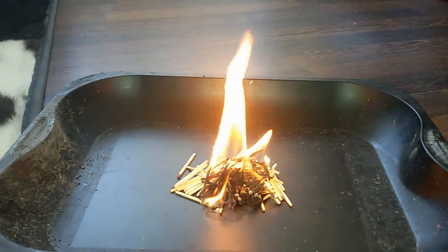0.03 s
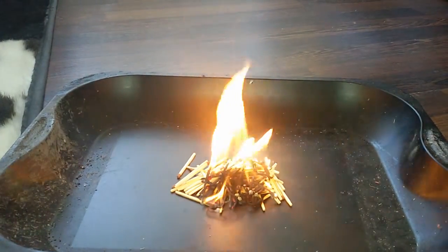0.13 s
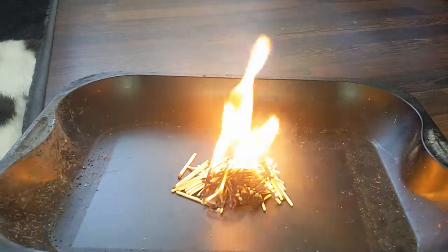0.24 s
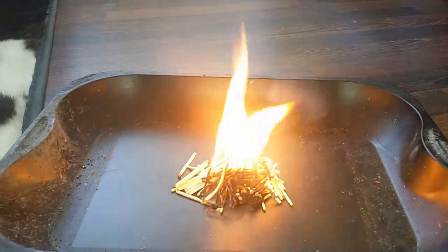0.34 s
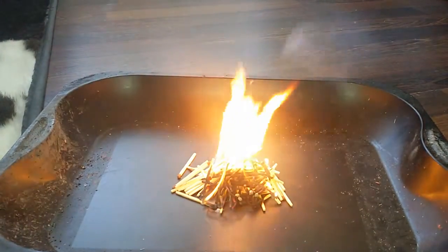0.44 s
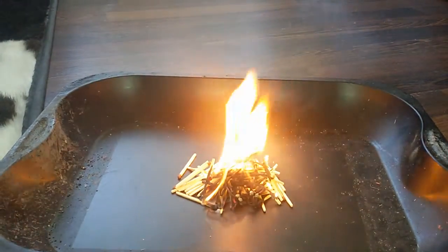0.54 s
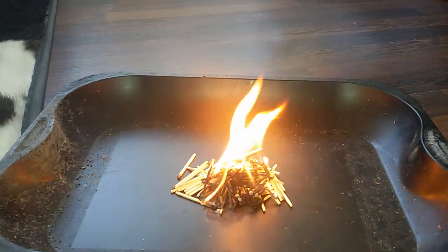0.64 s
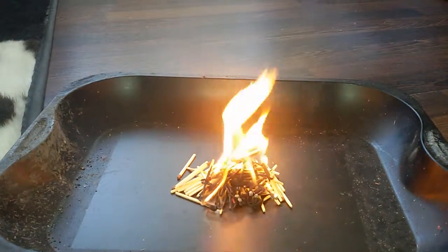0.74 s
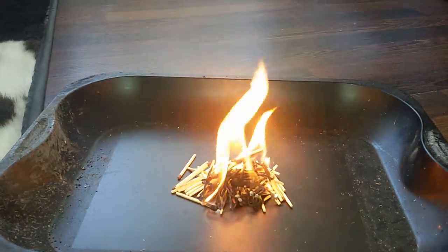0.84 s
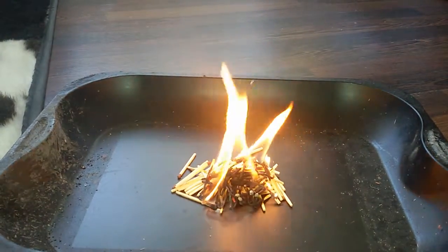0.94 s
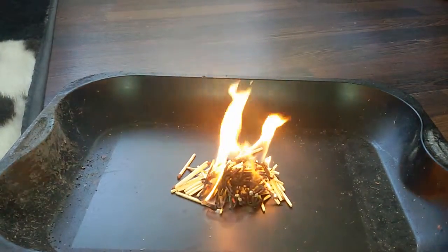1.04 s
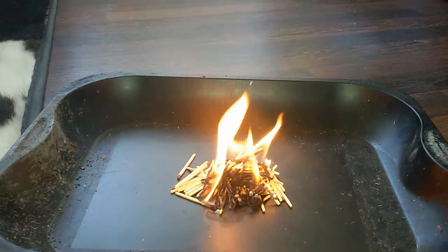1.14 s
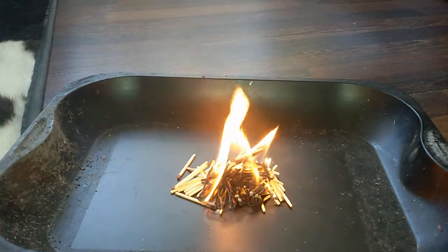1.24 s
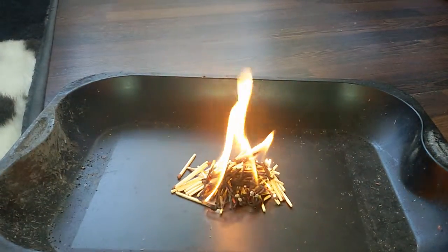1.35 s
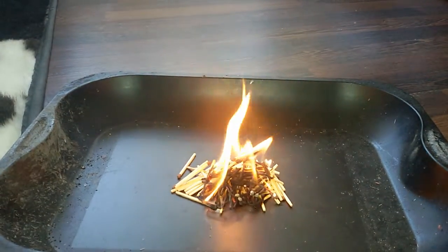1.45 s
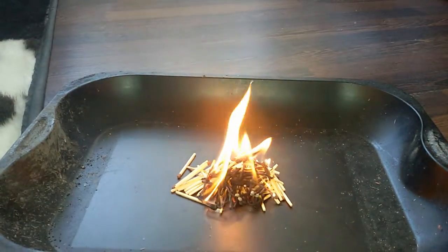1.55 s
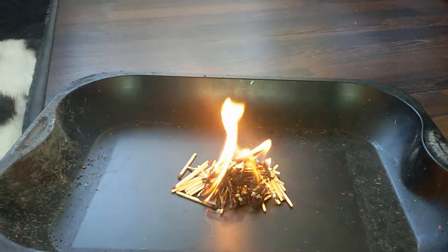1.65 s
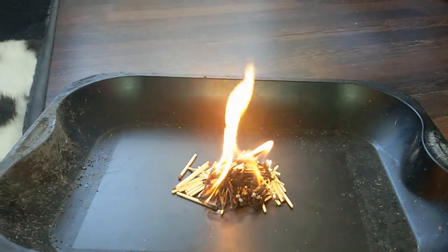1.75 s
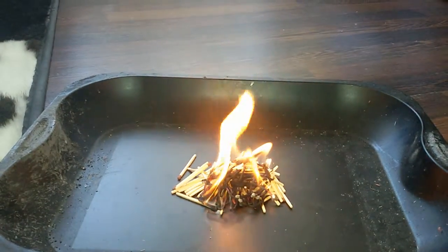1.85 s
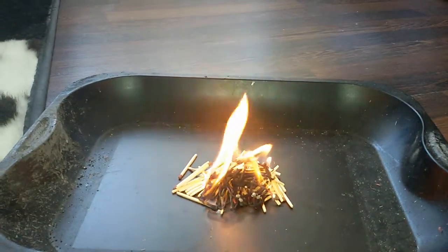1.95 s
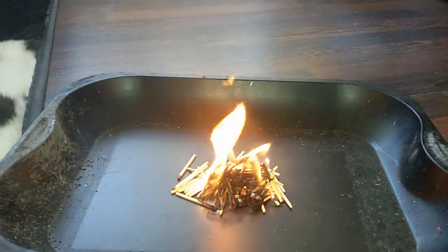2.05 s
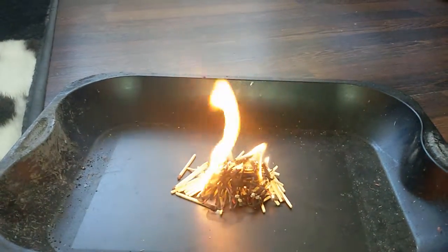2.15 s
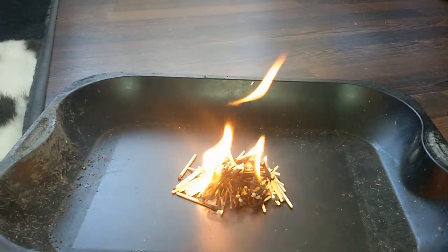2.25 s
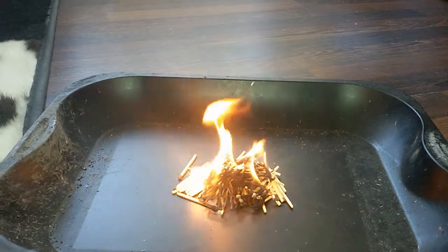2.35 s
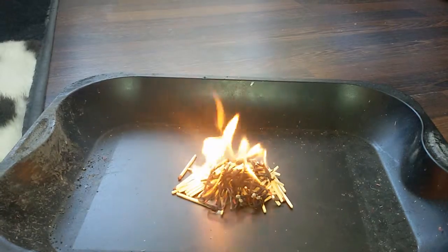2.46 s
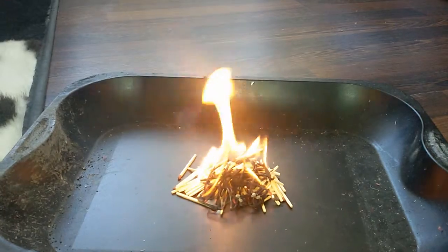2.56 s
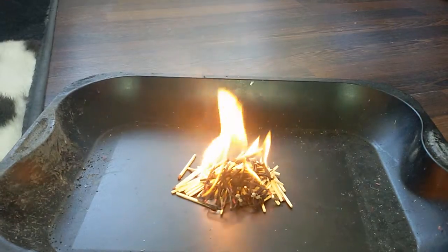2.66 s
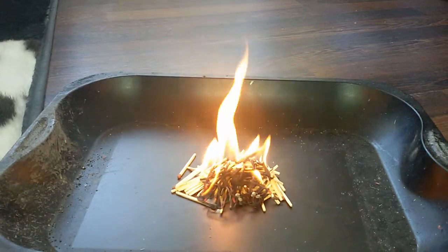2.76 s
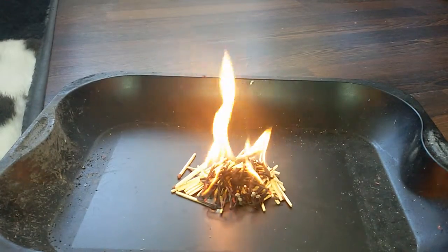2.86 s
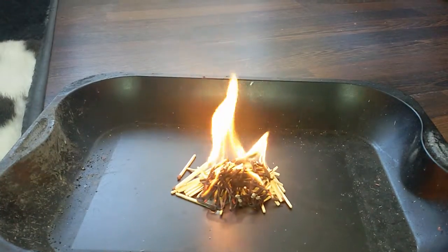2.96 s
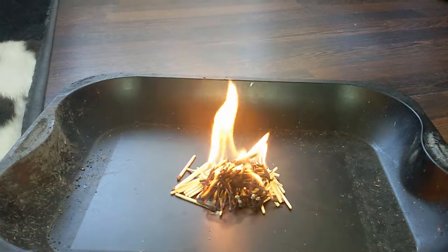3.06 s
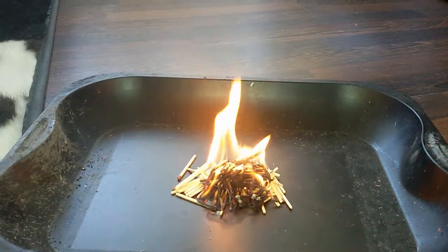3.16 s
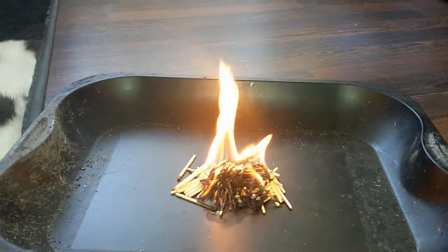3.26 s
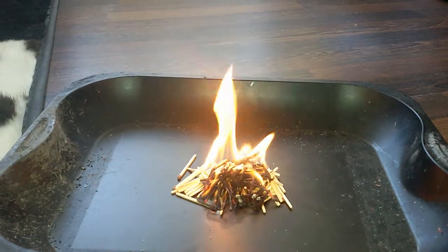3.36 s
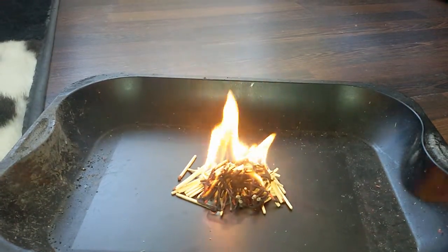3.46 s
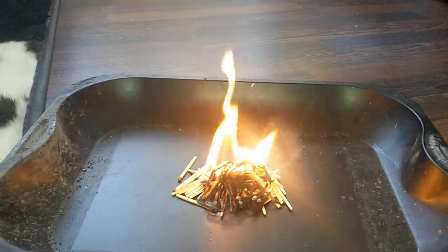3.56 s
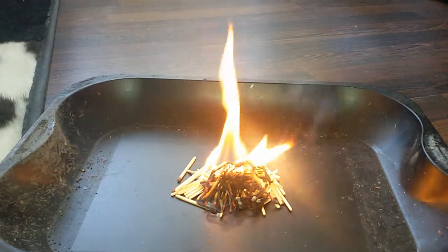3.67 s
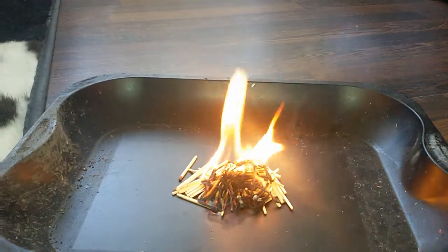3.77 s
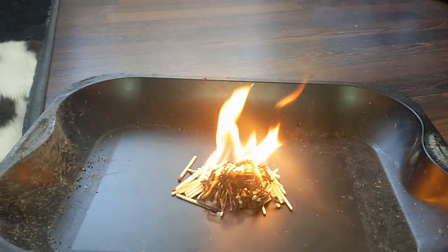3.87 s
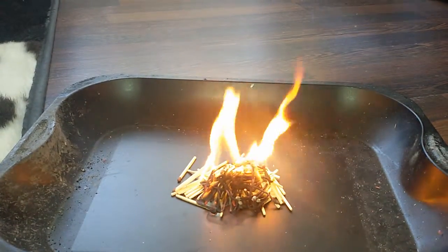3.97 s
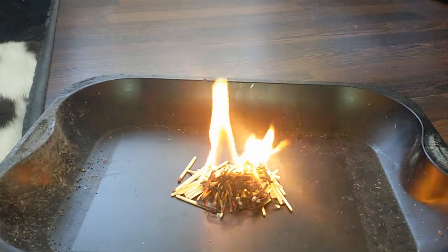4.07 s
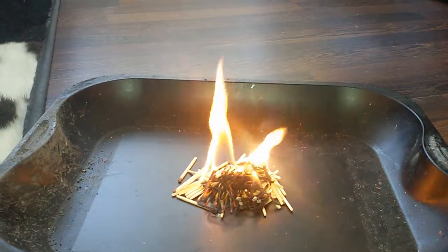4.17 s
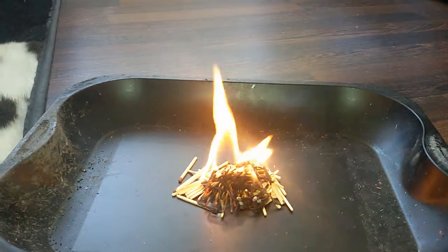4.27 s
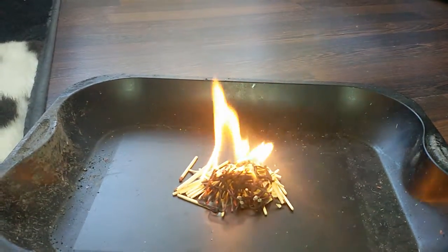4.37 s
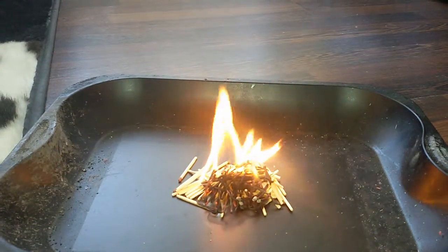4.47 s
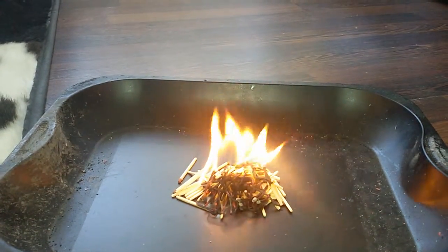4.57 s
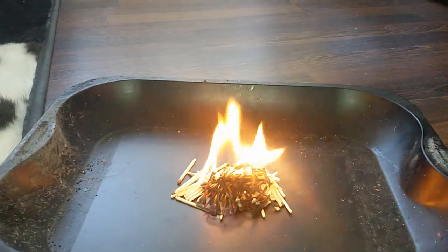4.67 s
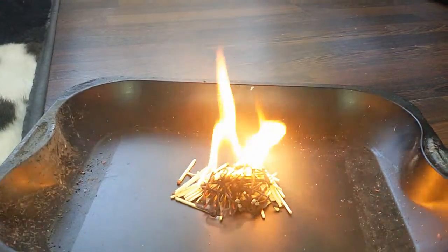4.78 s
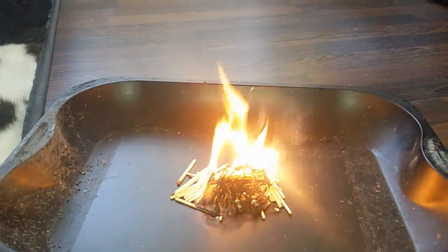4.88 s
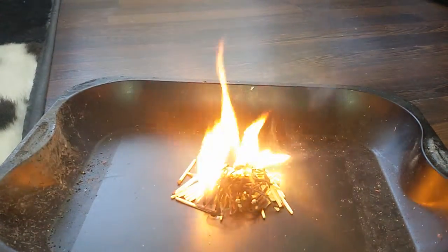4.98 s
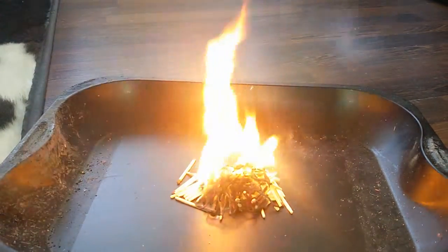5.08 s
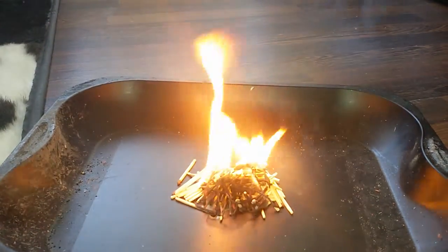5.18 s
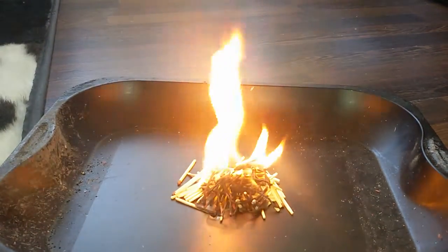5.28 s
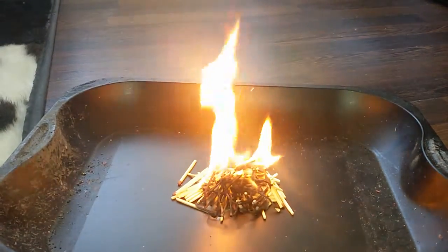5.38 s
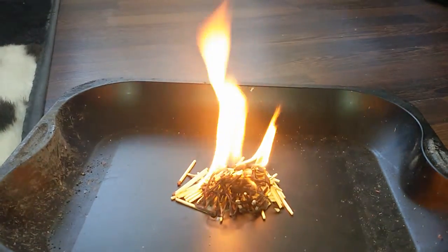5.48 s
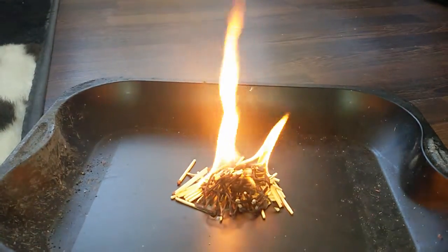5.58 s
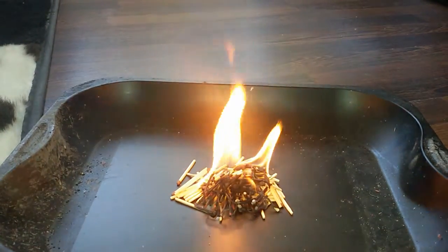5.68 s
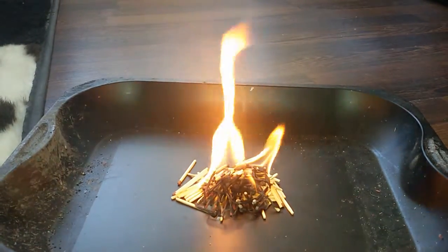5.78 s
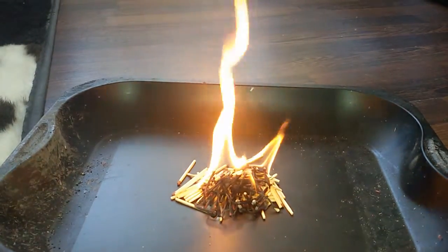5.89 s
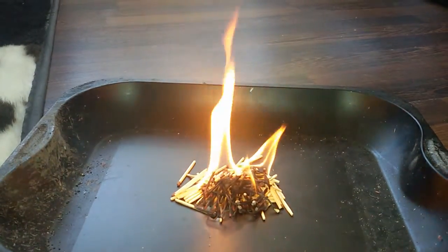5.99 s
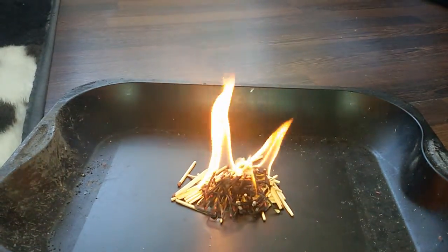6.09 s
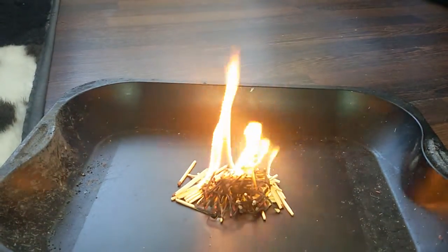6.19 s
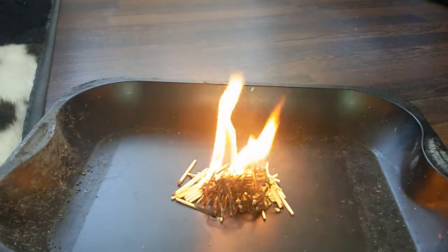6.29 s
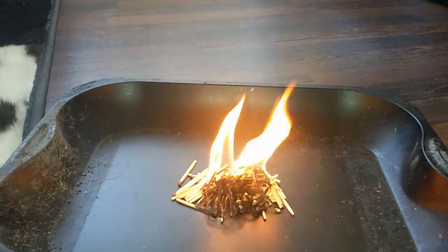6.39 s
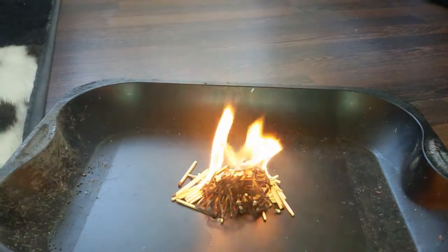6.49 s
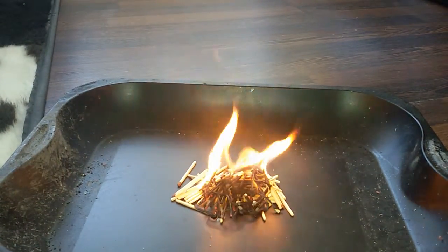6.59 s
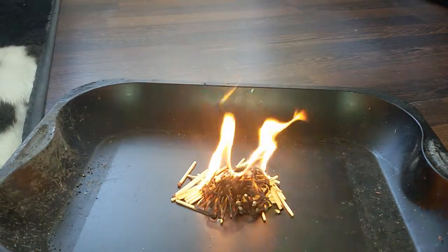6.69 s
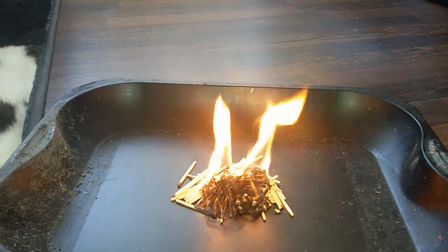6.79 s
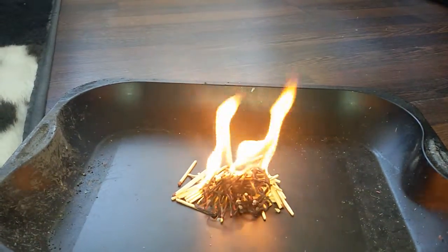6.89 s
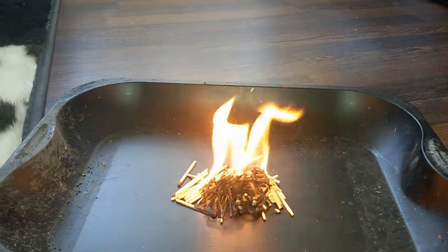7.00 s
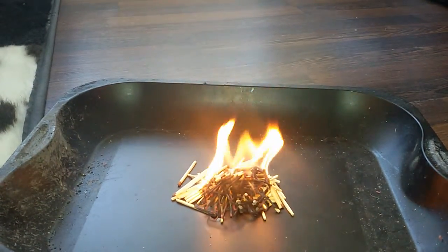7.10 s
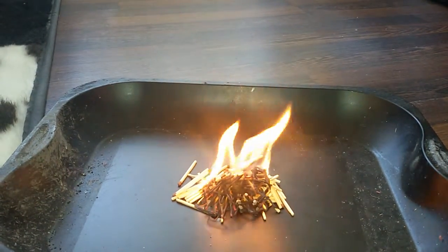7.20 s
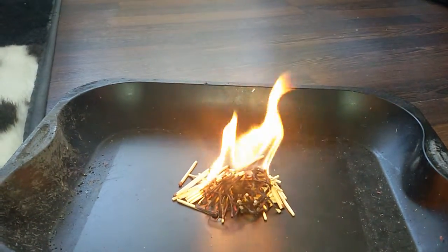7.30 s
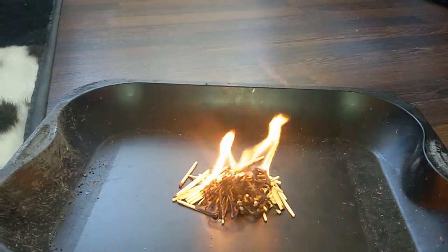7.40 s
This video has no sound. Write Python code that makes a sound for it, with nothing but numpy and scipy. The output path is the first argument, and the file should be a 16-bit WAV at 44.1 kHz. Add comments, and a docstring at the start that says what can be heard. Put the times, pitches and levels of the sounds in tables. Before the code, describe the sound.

A small match fire in a thin metal tray, close microphone, little echo. Flares of grainy hiss come irregularly, some hollow and midrange, some bright and crisp, each under half a second. Sharp pops and fine treble frying ride on them. Between flares only faint room air and hum remain. The strongest sputtering comes past the middle, followed by a dull puff and spitting gas jets.

```python
"""In a quiet room, a pile of wooden matches burns close by in a metal roasting tray.
Head after head catches: random tiny gas bursts make a dense sizzle, over a soft rush of flame (coloured noise).
Crackles and sharp pops are single pushes of gas; molten heads fry finely and spit short jets of noise.
Pockets of gas catch with a low puff of about one cycle. The tray's resonances colour the bursts and jets.
The room adds air noise, a faint hum, a low drone that swells once, and a short echo."""
import sys
import numpy as np
from scipy import signal
from scipy.fft import rfft, irfft, next_fast_len
from scipy.io import wavfile
from scipy.ndimage import map_coordinates

SR = 44100
rng = np.random.default_rng(int(sys.argv[2]) if len(sys.argv) > 2 else 0)


def to_wav(sig):
    """Store sig (one row per channel, or 1-D mono) as 16-bit WAV at the path in sys.argv[1].

    Samples outside -1..1 are clipped; the rate is SR.
    """
    pcm = np.clip(np.atleast_2d(sig), -1, 1) * 32767
    pcm = np.round(pcm).astype(np.int16)
    wavfile.write(sys.argv[1], SR, pcm.T)  # frames by channels


N = 328448
TIME = np.arange(N) / SR  # s
SIZE = next_fast_len(N + 16384, True)  # room at the end for filters to ring out
FREQ = np.fft.rfftfreq(SIZE, 1 / SR)  # Hz
REFERENCE_DB = -45.5  # sizzle level at which burst and crackle rates are given


def amp(db):
    """Decibels to gain."""
    return 10 ** (np.asarray(db) / 20)


def unit(x):
    """Scale to rms 1."""
    return x / np.sqrt(np.mean(x ** 2) + 1e-20)


def curve(rows):
    """Join (t/s, value) rows into one value per sample."""
    return np.interp(TIME, *np.transpose(rows))


def wobble(rate):
    """A smooth random curve through `rate` random points a second."""
    points = rng.standard_normal(int(N * rate / SR) + 4)
    return map_coordinates(points, [TIME * rate])


def colour(points):
    """Gain per frequency from (f/Hz, level/dB) points on a log axis."""
    hz, db = np.transpose(points)
    return amp(np.interp(np.log(FREQ + 1), np.log(hz), db))


def filtered(x, response):
    """Pass x through a frequency response."""
    return irfft(rfft(x, SIZE) * response, SIZE)[:N]


def noise(points):
    """Coloured noise of rms 1."""
    return unit(filtered(rng.standard_normal(N), colour(points)))


def add(track, s, sound):
    """Mix a sound into a track at time s, in seconds."""
    part = track[max(round(s * SR), 0):][:len(sound)]
    part += sound[:len(part)]


def resonances(rows):
    """Gain per frequency from (f/Hz, width/Hz, level/dB) rows: bell-shaped peaks and dips."""
    return amp(sum(db * np.exp(-.5 * ((FREQ - hz) / width) ** 2) for hz, width, db in rows))


def causal(gain):
    """The fastest response with this gain that never sounds ahead of its cause."""
    cepstrum = irfft(np.log(gain), SIZE)
    cepstrum[1:SIZE // 2] *= 2
    cepstrum[SIZE // 2 + 1:] = 0
    return np.exp(rfft(cepstrum))


def in_tray(points, ripple, turn_hz=2600):
    """Response, of energy 1, of one tiny burst heard in the tray."""
    # resonances (+) and notches (-) of the tray, for every burst: f/Hz, width/Hz, level/dB
    tray = [(550, 25, 2), (730, 45, 2.5), (1314, 9.6, 9), (1463, 37, -3.5), (1613, 98, 5), (1776, 61, -6),
            (1950, 44, 2)]
    response = causal(colour(points) * resonances(tray + ripple))
    # the pressure swings both ways before it rings out
    response = response * (1j * FREQ - turn_hz) / (1j * FREQ + turn_hz)
    return response / np.linalg.norm(irfft(response, SIZE))


def room():
    """Steady air noise and hum tones with a slightly drifting phase; a low drone swells once."""
    # colour of the room's air noise: f/Hz, relative level/dB
    air_colour = [(15, -61), (30, -14), (50, 0.5), (105, -0.5), (190, -3), (310, -5.5), (420, -12),
                  (600, -6), (720, -10), (910, -10), (1050, -13.5), (1920, -9), (3350, -14), (14500, -21.5)]
    # hum tones in the room: f/Hz, rms level before the hum's 1 dB cut/dB
    hum_tones = [(102.3, -86), (146, -76.5), (198, -75), (498, -81), (861.3, -78), (931.3, -75.5),
                 (1147, -79), (1863, -80)]
    hum = np.zeros(N)
    for hz, db in hum_tones:
        hum += amp(db) * np.sqrt(2) * np.sin(2 * np.pi * hz * TIME + .5 * wobble(6))
    drone_level = amp(curve([(1.85, -100), (2.02, -69), (2.33, -62), (2.5, -100)]))
    drone = drone_level * np.sin(2 * np.pi * 68 * TIME)
    return amp(-61.5) * noise(air_colour) + amp(-1.0) * hum + drone


def burn(s, length, attack, sag_db):
    """Strength of one head: it catches, sags as it burns, dies fast, and its last part smoulders on."""
    release_s, smoulder_db, smoulder_db_per_s = 0.028, -11.5, 34
    age = np.maximum(TIME - s, 0)
    spent = np.maximum(age - length, 0)  # time since the head burned out
    rest = amp(smoulder_db)
    dying = (1 - rest) * np.exp(-spent / release_s) + rest * amp(-smoulder_db_per_s * spent)
    return (1 - np.exp(-age / attack)) * amp(-sag_db * (age - spent)) * dying


def lagged(power, lag_s):
    """Follow a power with a time lag."""
    keep = np.exp(-1 / (lag_s * SR))
    return signal.lfilter([1 - keep], [1, -keep], power)


def blaze(embers_db=-80, steady_flame_db=-69, flame_lag_s=0.032, melt_lag_s=0.037):
    """All heads add in power: sizzle dB, its bright share, and the strengths of flame and frying."""
    # match heads catching: t/s, burn length/s, attack/s, sizzle level/dB, sag (negative: swell)/dB per s,
    # brightness (0 hollow - 1 bright), flame level/dB, frying level/dB; levels ahead of attack, sag and lag
    heads = [(0.0, 0.15, 0.022, -66, -5, .8, -78, -80), (0.223, 0.38, .044, -41.5, 1, .05, -51.5, -66),
             (0.634, 0.14, 0.036, -46.5, -6, 0.1, -51, -57),
             (0.88, 0.058, 0.01, -53.5, 3, 0.22, -66, -55.5), (2.156, 0.16, 0.027, -60.5, 1, 0.8, -63, -78),
             (2.334, 0.46, 0.012, -53, 4, 0.77, -56.5, -67),
             (3.548, 0.17, 0.025, -41.5, 8.5, 0.026, -49.5, -70),
             (3.733, 0.072, 0.023, -48.5, 7, .03, -49.5, -59), (3.876, 0.05, 0.017, -56, 2, .05, -59, -59),
             (4.12, 0.41, 0.011, -53, 13.5, .04, -55, -62.5),
             (4.733, 0.099, 0.017, -55, -0.5, .1, -59, -67), (4.793, 0.17, 0.0087, -45, 6, .05, -53, -61),
             (4.929, 0.12, 0.024, -36.5, 11, 0.8, -45.5, -60),
             (5.109, 0.138, .015, -42, 27, 0.58, -49, -51.5), (5.354, .1, 0.019, -53, 4, 0.95, -54, -73),
             (5.505, 0.27, 0.016, -46.5, 16, 0.71, -50, -60),
             (6.193, 0.058, 0.027, -42.5, -2.5, .02, -53.5, -70),
             (6.288, 0.28, 0.013, -41, 10.5, 0.12, -49.5, -66),
             (6.393, 0.13, 0.021, -44, 10, .35, -56, -50),
             (6.886, 0.4, 0.022, -49, 10, 0.016, -52.5, -59.5),
             (7.312, 0.11, 0.02, -57.5, 12, .05, -60, -65)]
    heat = bright = rush = melt = 0
    for s, length, attack, db, sag_db, share, flame_db, fry_db in heads:
        power = burn(s, length, attack, sag_db) ** 2
        heat = heat + power * amp(db) ** 2
        bright = bright + power * amp(db) ** 2 * share
        rush = rush + power * amp(flame_db) ** 2
        melt = melt + power * amp(fry_db) ** 2
    heat = heat + amp(embers_db) ** 2
    # the flame and the frying melt follow the heads with a lag
    rush = lagged(rush, flame_lag_s) + amp(steady_flame_db) ** 2
    melt = lagged(melt, melt_lag_s)
    return 10 * np.log10(heat), bright / heat, np.sqrt(rush), np.sqrt(melt)


def bursts(rate, spread_db, smooth):
    """Random tiny bursts of uneven size, plus a share of smooth gas hiss (0-1), rms about 1."""
    sizes = amp(spread_db * np.clip(rng.standard_normal(N), -2, 2))
    happens = rng.random(N) < rate / SR
    # dividing by sqrt(rate) stops denser bursts from being louder overall
    train = happens * sizes * rng.choice([-1, 1], N) / np.sqrt(rate)
    return np.sqrt(1 - smooth) * unit(train) + np.sqrt(smooth) * rng.standard_normal(N)


def sizzle(level_db, share, hollow, bright):
    """The harder a head burns, the louder and denser its bursts; the jet flutters as it goes."""
    rate = 2000 * amp(.5 * (level_db - REFERENCE_DB))  # bursts per second
    strength = amp(level_db + 0.68 * wobble(45) + 0.55 * wobble(170))
    soft = strength * np.sqrt(1 - share) * bursts(rate, spread_db=4.0, smooth=0.33)
    sharp = strength * np.sqrt(share) * bursts(.55 * rate, spread_db=0.5, smooth=0.28)
    return amp(-1.16) * filtered(soft, hollow) + amp(-2.0) * filtered(sharp, bright)


def frying(melt, fine):
    """A molten head crackles finely in the treble."""
    return filtered(melt * bursts(1000, spread_db=1, smooth=0.53), fine)


def flame(rush):
    """The flame rushes softly, and puffs for about one cycle when a pocket of gas catches."""
    # colour of the rushing flame: f/Hz, relative level/dB
    rush_colour = [(25, -22), (60, -2.5), (160, 2), (320, -1), (700, -4.5), (1200, -5.5), (3000, -12),
                   (15000, -27)]
    # gas pockets catching, the biggest at two pitches: t/s, level before fading in and out/dB, f/Hz
    puffs = [(3.2171, -44, 125), (3.309, -45, 134), (5.4400, -31, 175), (5.4402, -32, 540),
             (5.491, -42, 190), (5.5008, -34.5, 264)]
    out = rush * amp(-0.5 + 1.7 * wobble(25)) * noise(rush_colour)
    t = np.arange(SR // 20) / SR
    for s, db, hz in puffs:
        swing = np.sin(2 * np.pi * hz * t + 1.84)
        envelope = np.exp(-(hz * t / 0.91) ** 2) * (1 - np.exp(-t / 0.0003))
        add(out, s, -amp(db) * swing * envelope)
    return out


def crackles(level_db, share, crowding=.4, growth=.78, bright_db=5):
    """Small random pops as (s, dB, brightness); a fierce head makes more, but its sizzle covers them."""
    # rate and level at the reference sizzle; bright heads then add level
    crackles_per_s, crackle_db, spread_db = 32, -36, 1.9
    effort_db = level_db - REFERENCE_DB
    chance, size = rng.random(N), rng.standard_normal(N)
    at = np.flatnonzero(chance < crackles_per_s * amp(crowding * effort_db) / SR)
    db = crackle_db + growth * effort_db[at] + bright_db * share[at]
    db = db + spread_db * np.clip(size[at], -2, 2)
    return list(zip(TIME[at], db, share[at]))


def pops(small_pops, hollow, bright, scatter_db=-26, scatter_t60=0.022,
         hollow_hz=5200, bright_hz=11000, hollow_db=6, bright_db=0.57):
    """Each pop is one push of gas and a brief dense scatter in the tray."""
    # loud bursts of a head's crust: t/s, level before the gains and softening below/dB, brightness (0-1)
    crust_pops = [(0.5352, -24.5, 0.32), (0.8184, -26.5, 0.57), (0.8758, -31, 0.44), (0.8925, -31.5, 1),
                  (0.9336, -22.5, 1), (1.159, -43, 0.98), (2.2059, -36.5, 1), (2.2599, -37, 1),
                  (2.274, -33.5, 1), (2.3511, -31, 1), (2.6184, -32.5, .4), (2.6982, -28.5, .85),
                  (2.7308, -24.5, 0.85), (2.7417, -37, 1), (2.7637, -23, 1), (3.77, -28.5, 0),
                  (3.7779, -34, 0), (3.784, -30.5, 0), (3.9118, -30.5, 0.46), (3.9347, -30, 0.1),
                  (4.3354, -38, .1), (4.392, -35, 0.27), (4.4229, -35.5, 0), (4.4531, -32.5, 0),
                  (4.4594, -32.5, 0.04), (4.9804, -18.5, 1), (4.9891, -20.5, .97), (5.025, -18.5, 0.67),
                  (5.0474, -22.5, 0.9), (5.102, -21.5, 0.89), (5.225, -32.5, .1), (5.2609, -22.5, 1),
                  (5.4561, -31, 0.55), (5.5027, -31.5, .8), (5.6866, -28.5, 0.7), (5.7003, -31.5, 0.24),
                  (5.7657, -24.5, 0.9), (5.7867, -24.5, 1), (6.2769, -21.5, .9), (6.2835, -28, .3),
                  (6.5171, -21, .85), (6.7494, -34, 0.54), (6.9106, -34, .06), (7.1863, -29.5, .05),
                  (7.2202, -31.5, 0.1), (7.2343, -33, 0.3), (7.2495, -32.5, .1), (7.2791, -35.5, 0.1),
                  (7.3325, -36.5, 0)]
    t = np.arange(SR // 20) / SR
    dull, sharp = np.zeros(N), np.zeros(N)
    for s, db, share in list(crust_pops) + small_pops:
        push = amp(scatter_db - 60 * t / scatter_t60) * rng.standard_normal(len(t))
        push[0] = 1
        add(dull, s, amp(db + hollow_db) * (1 - share) * push)
        add(sharp, s, amp(db + bright_db) * share * push)
    out = np.zeros(N)
    for track, response, hz in [(dull, hollow, hollow_hz), (sharp, bright, bright_hz)]:
        # the pops are softened: their treble rolls off above a fixed corner
        softened = response / (1 + 1j * FREQ / hz) ** 2
        out += filtered(track, softened) / np.abs(irfft(softened, SIZE)).max()
    return out


def spits(rough, fine):
    """Gas breaks through the melt in jets that die within milliseconds."""
    # short jets of gas: t/s, level before fading in and out/dB, time to fall 60 dB/s, fine share (0-1)
    jets = [(0.7856, -41, 0.027, 0), (4.761, -36.5, 0.01, 0.4), (5.1396, -18, 0.031, 0.01),
            (5.167, -28, 0.028, 0), (5.3973, -31.5, 0.014, 0.1), (6.409, -24, 0.0089, 0.2),
            (6.4327, -28, 0.0099, 0.6), (6.458, -23.5, 0.0093, 0.06), (6.4735, -14, 0.0069, 0.56),
            (6.5257, -27, 0.012, 0.7), (6.5362, -24.5, 0.0075, .4)]
    t = np.arange(SR // 10) / SR
    coarse, thin = np.zeros(N), np.zeros(N)
    for s, db, t60, share in jets:
        envelope = amp(db - 60 * t / t60) * (1 - np.exp(-t / 0.00083))
        jet = envelope * rng.standard_normal((2, len(t)))
        add(coarse, s, np.sqrt(1 - share) * jet[0])
        add(thin, s, np.sqrt(share) * jet[1])
    return filtered(coarse, rough) + filtered(thin, fine)


def walls(x, t60=0.24, wet_db=-17):
    """A faint short echo from the walls: a fading noise tail."""
    t = np.arange(SR // 3) / SR
    tail = rng.standard_normal(len(t)) * amp(-60 * t / t60) * (t > .003)
    return amp(wet_db) * signal.fftconvolve(x, tail / np.linalg.norm(tail))[:N]


def spread(fire):
    """The fire creeps across the pile, and its colour changes with the spot."""
    # the last heads burn where the tray answers differently: f/Hz, width/Hz, level/dB
    far_spot = [(1967, 220, 1.5), (2298, 120, -2), (2610, 120, -7.5), (3024, 160, 4), (4160, 460, -1.5),
                (6080, 170, 4), (8450, 1100, 4.5)]
    moved = curve([(5.9, 0), (6.1, 1)])
    return (1 - moved) * fire + moved * filtered(fire, causal(resonances(far_spot)))


def scene():
    """The fire and the room, alike in both channels."""
    # colours of hollow and bright heads, jets and fine frying: f/Hz, relative level/dB
    hollow_colour = [(60, -22.5), (400, -11.5), (750, -9), (1050, -15), (1450, -10.5), (1950, 1), (2300, 1),
                     (2800, -5.5), (3300, -6), (4000, -10), (6300, -15), (8200, -23), (10000, -31),
                     (15000, -34.5)]
    bright_colour = [(60, -41), (400, -14), (800, -15.5), (1050, -20.5), (1450, -7), (1700, -2.5),
                     (2100, -4), (2700, -2.5), (3500, -3.5), (5200, -5.5), (7000, -12), (8800, -17),
                     (10000, -23), (15000, -30)]
    jet_colour = [(60, -25), (600, -13), (1350, -26), (1650, -6), (2050, 4.5), (2800, -15), (3400, -3.5),
                  (4200, -6), (4900, -11.5), (5900, -6.5), (6800, -21), (9000, -22), (15000, -54)]
    fine_colour = [(60, -45), (2000, -20), (4000, -9), (6500, -1), (8500, -1.5), (11000, -4), (14500, 0)]
    # further resonances (+) and notches (-) of hollow and bright heads: f/Hz, width/Hz, level/dB
    hollow_ripple = [(2240, 150, 1), (2890, 87, -7.5), (3170, 74, 2.5), (3404, 95, 3.5), (3840, 160, -5.5),
                     (4240, 72, 3), (5500, 160, -1), (6160, 230, 3), (7130, 96, -9), (11060, 340, 9)]
    bright_ripple = [(2420, 99, -5), (3230, 96, 3.5), (3760, 150, 3.5), (4130, 140, -7), (5740, 220, -6.5),
                     (6550, 130, -13)]
    hollow = in_tray(hollow_colour, hollow_ripple)
    bright = in_tray(bright_colour, bright_ripple)
    rough, fine = in_tray(jet_colour, []), in_tray(fine_colour, [])

    air = room()
    level_db, share, rush, melt = blaze()
    hiss = sizzle(level_db, share, hollow, bright) + frying(melt, fine)
    flames = flame(rush)
    popping = pops(crackles(level_db, share), hollow, bright)
    fire = spread(hiss + popping + spits(rough, fine)) + flames
    mono = fire + walls(fire) + air
    return np.array([mono, mono])


def record(dry):
    """Keep nothing above the band limit."""
    top_hz = 14850
    return np.array([filtered(channel, FREQ < top_hz) for channel in dry])


dry = scene()
out = record(dry)
to_wav(out)
```